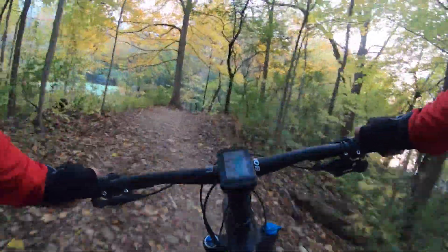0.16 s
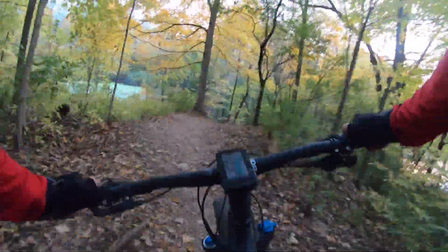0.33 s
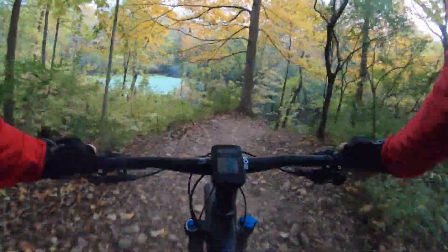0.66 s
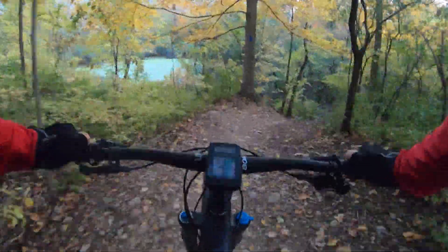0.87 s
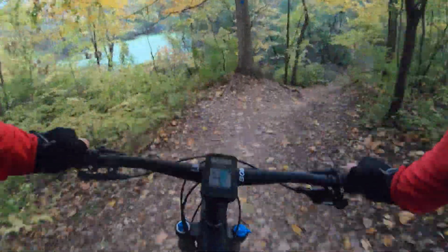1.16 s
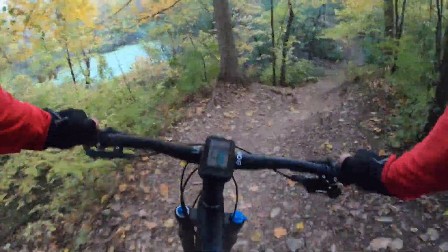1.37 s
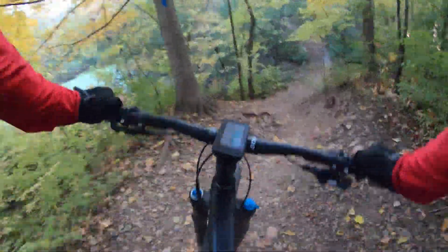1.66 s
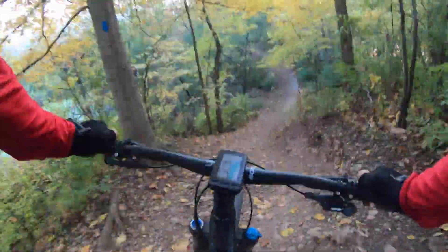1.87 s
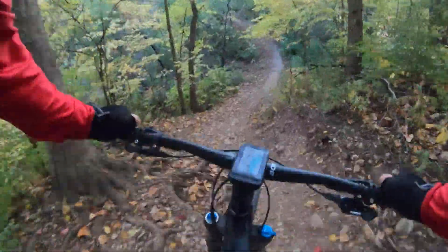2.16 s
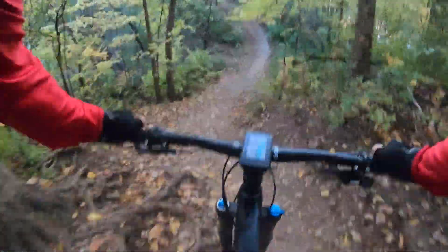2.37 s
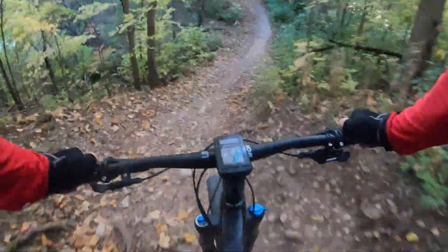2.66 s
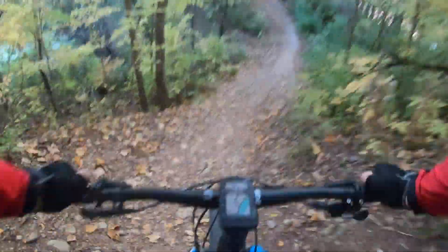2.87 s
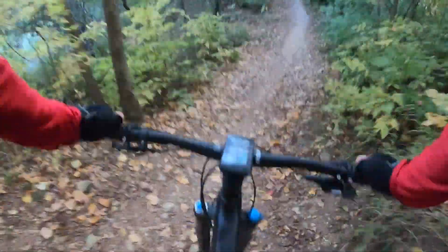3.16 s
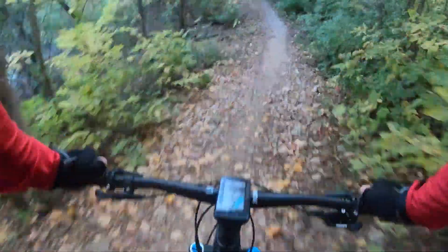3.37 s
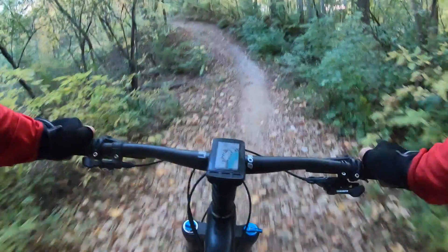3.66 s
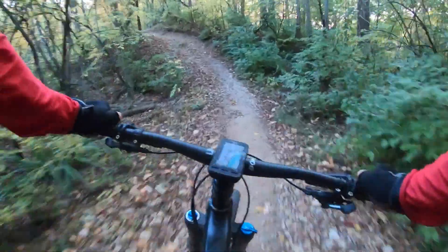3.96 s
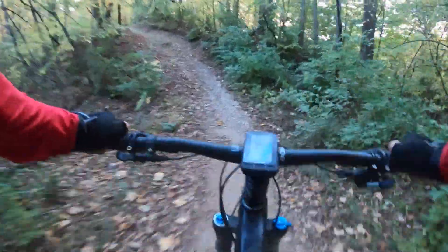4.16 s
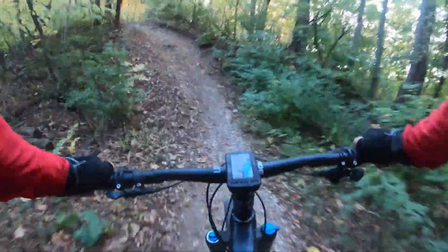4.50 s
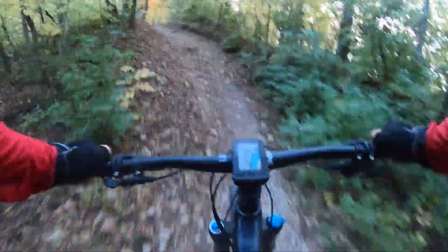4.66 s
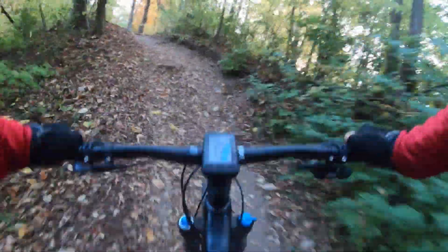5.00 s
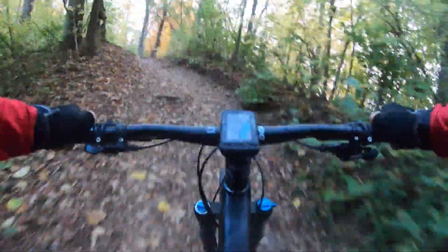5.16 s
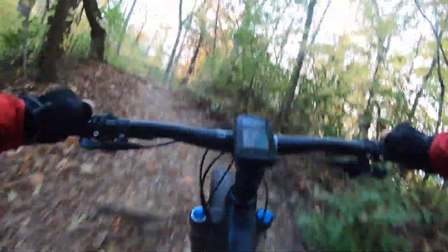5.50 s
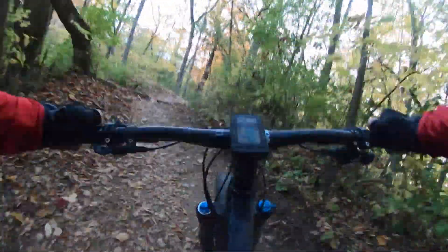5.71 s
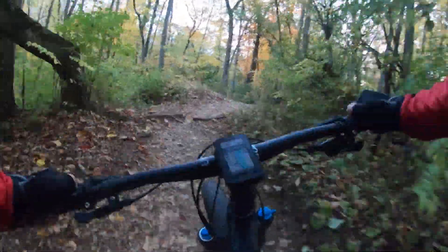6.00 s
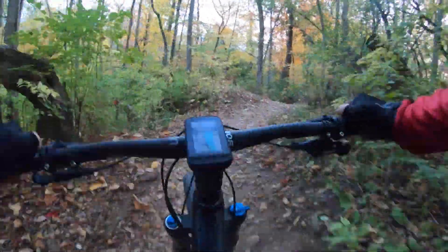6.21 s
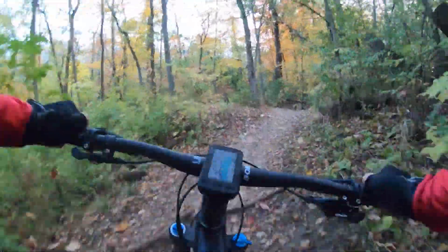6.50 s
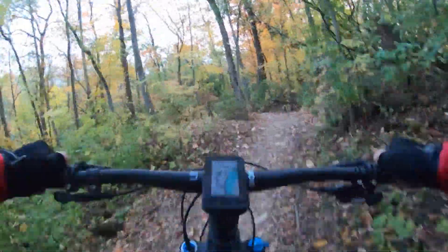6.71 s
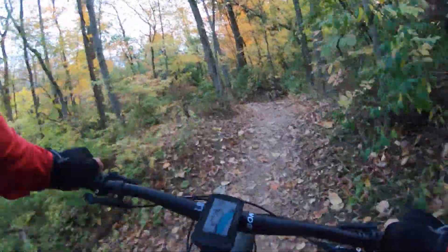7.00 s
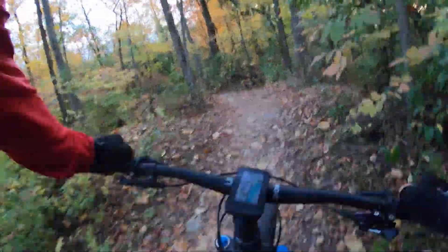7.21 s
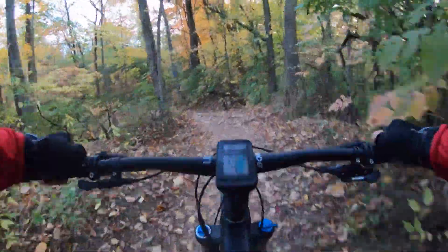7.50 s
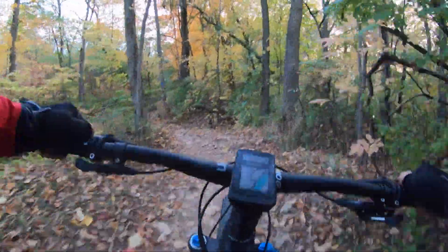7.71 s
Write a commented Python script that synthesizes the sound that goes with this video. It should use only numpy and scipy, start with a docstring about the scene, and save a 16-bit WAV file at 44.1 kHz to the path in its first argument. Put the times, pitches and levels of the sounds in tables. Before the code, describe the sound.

Throughout about eight seconds, bicycle tyres crunch grit, pebbles and dry leaves in small irregular clumps, with a faint low thrum, while wind rumbles at a chest-worn microphone, gusting mostly on the left. At 0.25 s a hollow knock and thump sound, then a small click. A strong fluttering gust fills 0.6 to 1 s; sharp pebble-like knocks come at 1.1 and a bright click at 1.26. Jolts begin around 1.5 and crowd together from 2.1 to 3.4: dull thumps, rattling chain, frame clunks and cable taps, with wind surging near 3. From 3.6 to 4.6 it is mostly gritty rolling and softer wind. A click, thump and gust hit at 4.65 to 4.9. Two thin, high chirps appear at 5.45 and 5.6. A brief hard gust buffets at 6.1; clicks and a thump follow at 6.5 to 6.8, then hard hollow clunks at 7.15 and 7.37, and a last tap at 7.5.

```python
"""A mountain bike rolls down a leafy dirt trail: its tyres crunch clumps of grit, pebbles and dry leaves.
Heard from two microphone ports at the rider's chest, an arm's length from the bar. Filtered noise buffets
each port as wind, and gusts catch the left one. Roots jolt the bike into thumps and sprays of rattling grains;
cables click, short pitched knocks and thuds sound and the frame clunks, all as decaying tones. Two thin chirps
sound."""
import sys
import numpy as np
from scipy import signal
from scipy.fft import rfft, irfft, next_fast_len
from scipy.io import wavfile
from scipy.ndimage import uniform_filter1d, map_coordinates

SR = 44100
rng = np.random.default_rng(int(sys.argv[2]) if len(sys.argv) > 2 else 0)


def unload_audio(sound):
    """Save the sound as a 16-bit wav file, at the path given as the first command line argument."""
    columns = np.transpose(np.atleast_2d(sound))
    # keep every value between -1 and 1, then stretch to whole-number steps
    steps = np.round(np.clip(columns, -1, 1) * 32767)
    wavfile.write(sys.argv[1], SR, steps.astype(np.int16))


N = 346185  # samples


def amp(db):
    """Decibels to gain."""
    return 10 ** (np.asarray(db) / 20)


def ports(left_db, right_db):
    """Gains for the left and right microphone port."""
    return amp([[left_db], [right_db]])


def unit(x):
    """Scale to rms 1."""
    return x / np.sqrt(np.mean(x ** 2) + 1e-20)


def along(points, hz):
    """Read (Hz, value) points on a log frequency axis."""
    f, v = np.transpose(points)
    return np.interp(np.log(hz + 1), np.log(f + 1), v)


def curves(rows):
    """One value per sample for each column after the time."""
    s, *cols = np.transpose(rows)
    return [np.interp(np.arange(N) / SR, s, c) for c in cols]


def wobble(rate):
    """A smooth random curve, rate knots a second."""
    knots = rng.standard_normal(int(N * rate / SR) + 4)
    return map_coordinates(knots, [np.arange(N) * rate / SR], order=2)


def filtered(x, response):
    """Multiply the spectrum of x by a response of frequency."""
    m = next_fast_len(N + SR // 2)
    return irfft(rfft(x, m) * response(np.fft.rfftfreq(m, 1 / SR)), m)[..., :N]


def colour(x, spectrum, size=8192):
    """Pass x through a causal, minimum-phase filter with the given spectrum."""
    gain = amp(along(spectrum, np.fft.rfftfreq(size, 1 / SR)))
    # folding the cepstrum onto positive times makes the filter minimum phase
    cepstrum = irfft(np.log(gain))
    cepstrum[1:size // 2] *= 2
    cepstrum[size // 2 + 1:] = 0
    impulse = irfft(np.exp(rfft(cepstrum)))
    return signal.oaconvolve(x, impulse[None], axes=1)[:, :N]


def hiss():
    """Two unrelated white noises."""
    return rng.standard_normal((2, N))


def grains(rate, spread_db):
    """Two trains of tiny impacts of random size at the same random moments, rate a second; rms 1."""
    hit = rng.random(N) < rate / SR
    size_db = spread_db * np.clip(rng.standard_normal(N), -2, 2)
    return unit(hiss() * hit * amp(size_db))


# How alike the bike sounds at the two ports. Each row: frequency in Hz, left-right likeness (1 = identical).
LIKENESS = [(300, 1), (550, 1), (1700, -0.14), (2300, 0.65), (4000, 0.98), (6000, 0.14), (9000, -0.0086)]


def from_bike(pair, spectrum):
    """Colour two excitations and mix them as the two ports hear the bike; rms 1."""
    def balance(hz):
        angle = np.arccos(np.clip(along(LIKENESS, hz), -1, 1)) / 2
        return np.array([np.cos(angle), np.sin(angle)])
    mid, side = filtered(colour(pair, spectrum), balance)
    return unit(np.array([mid + side, mid - side]))


def add(track, s, sound):
    """Mix a sound into a track at time s."""
    start = max(round(s * SR), 0)
    track[..., start:start + sound.shape[-1]] += sound[..., :N - start]


def bursts(times, levels_db, attack, t60):
    """An envelope that rises quickly at each time and dies away, 60 dB in t60 seconds."""
    envelope, t = np.zeros(N), np.arange(SR // 2) / SR
    for s, db in zip(times, levels_db):
        add(envelope, s, amp(db - 60 * t / t60) * (1 - np.exp(-t / attack)))
    return envelope


def swells(rows, rise, fall):
    """Sum rows of (s, length s, dB) into one envelope: each rises, holds and falls away."""
    envelope, t = np.zeros(N), np.arange(N) / SR
    for s, length, db in rows:
        onset = (1 + np.tanh((t - s) / rise)) / 2
        release = (1 - np.tanh((t - s - length) / fall)) / 2
        envelope += amp(db) * onset * release
    return envelope


PATCH_HZ, PATCH_S = 450, .018  # size of one patch in frequency and time


def patchy(x, depth_db, size=256):
    """Every stone and leaf rings differently: random peaks come and go across the spectrum; rms 1."""
    z = signal.stft(x, nperseg=size)[2]
    field = rng.standard_normal(z.shape[1:])
    field = uniform_filter1d(field, round(PATCH_HZ * size / SR), axis=0)
    field = unit(uniform_filter1d(field, round(PATCH_S * SR * 2 / size), axis=1))
    varied = z * amp(depth_db * np.clip(field, -2, 2))
    return unit(signal.istft(varied, nperseg=size)[1][:, :N])


# Thin chirps, perhaps beside the trail. Each row: start in seconds, level in dB before the soft attack.
CHIRPS = [(5.434, -26), (5.608, -29)]


def chirps():
    """Two thin chirps, perhaps a small bird beside the trail: a sine of wavering pitch in short bursts."""
    s, db = np.transpose(CHIRPS)
    hz = 6350 + 260 * wobble(400)
    return bursts(s, db, attack=0.018, t60=0.04) * np.sin(2 * np.pi * np.cumsum(hz) / SR)


# Air streaming past the chest. Each row: time in seconds, airflow in dB before the port offsets.
AIRFLOW = [(0, -42), (0.6, -36), (1.0, -29), (1.6, -49), (2.3, -41.5), (2.85, -23.5), (3.3, -26.5),
           (3.85, -32.5), (4.25, -24), (4.75, -32.5), (5.1, -37), (5.95, -32), (6.25, -31), (6.7, -38),
           (7.85, -35)]
LEFT_PORT_DB, RIGHT_PORT_DB = 4.5, -11  # the left port faces the stream
# Gusts catching the left port. Each row: start in seconds, length in seconds,
# airflow in dB, roar in dB before the port balance.
GUSTS = [(0.048, 0.21, -20.5, -51), (0.44, 0.17, -24, -41.5), (0.61, 0.39, -18, -27.5),
         (0.988, 0.56, -21, -38.5), (1.81, 0.031, -14.5, -29), (2.97, 0.2, -16, -30),
         (3.206, 0.15, -17, -24.5), (3.57, 0.43, -22.5, -35), (4.005, 0.67, -25.5, -41),
         (4.73, 0.19, -14.5, -24.5), (4.997, 0.92, -24, -47.5), (5.422, 0.15, -20.5, -29),
         (6.071, 0.035, -7.5, -27), (6.152, 0.39, -23.5, -37.5), (6.72, 0.17, -23, -38.5),
         (7.726, 0.06, -11.5, -32)]
GUST_RISE_S, GUST_FALL_S = 0.029, 0.044
ROAR_RISE_S, ROAR_FALL_S = 0.013, 0.037  # the roar sets in and dies more sharply than the buffet
ROAR_GROWS = 1.53  # dB of steady roar per dB of airflow
TEAR_DB, TEAR_GROWS = -33, 1.24  # in the hardest gust, before the port balance; dB per dB of roar
# Wind at the ports: slow pressure swings, buffeting, roar, and the upper edge of a hard gust.
# Each row: frequency in Hz, relative level in dB per Hz.
SWAY = [(10, -5.5), (35, 0), (90, -5), (1500, -100)]
BUFFET = [(20, -20), (65, -0.5), (120, -5), (200, -14.5), (400, -35), (3000, -100)]
ROAR = [(50, -22.5), (130, 2), (330, -1.5), (500, -13), (900, -32), (1600, -35.5), (12000, -85)]
TEAR = [(150, -1), (650, -4), (1400, -22.5), (9000, -62)]


def wind():
    """Eddies buffet each port on its own; gusts catch the left one and break into a higher, fluttering roar."""
    air_db, = curves(AIRFLOW)
    s, length, buffet_db, roar_db = np.transpose(GUSTS)
    gust = swells(zip(s, length, buffet_db), GUST_RISE_S, GUST_FALL_S)
    gust_roar = swells(zip(s, length, roar_db), ROAR_RISE_S, ROAR_FALL_S)
    left_air = np.hypot(amp(air_db + LEFT_PORT_DB), gust)
    port_air = np.array([left_air, amp(air_db + RIGHT_PORT_DB)])
    flutter = amp(2 * np.array([wobble(30), wobble(30)]))
    buffet = amp(-6.5) * port_air ** 0.82 * unit(colour(hiss(), BUFFET))
    # the largest eddies grow less with airspeed than the small ones
    sway = amp(-19.0) * port_air ** 0.35 * unit(colour(hiss(), SWAY))
    steady_roar = amp(-44.5 + ROAR_GROWS * (air_db - air_db.mean()))
    roar_level = np.hypot(steady_roar, gust_roar * ports(3, -9))
    roar = roar_level * unit(colour(hiss(), ROAR) * flutter)
    tear_level = amp(TEAR_DB) * (gust_roar / gust_roar.max()) ** TEAR_GROWS
    tear = tear_level * unit(colour(hiss(), TEAR) * flutter)
    return sway + buffet + roar + tear * ports(3, -7)


# Hard knocks through the frame, below the chest. Each row: start in seconds, then the
# low, middle and high ring in dB before the mode levels.
CLUNKS = [(0.245, -32, -40, -46), (2.506, -28.5, -33, -31), (2.81, -36, -38, -45), (7.151, -21, -30.5, -29),
          (7.367, -21.5, -33.5, -31)]
# Modes of the hollow frame. Each row: frequency in Hz, relative level in dB, 60 dB decay in seconds.
FRAME = [(465, -2.5, 0.068), (618, 0.5, 0.069), (694, -2.5, 0.059), (865, 6.5, 0.023), (1000, -5.5, 0.12),
         (1234, 4, 0.029), (1490, 2.5, 0.018), (2320, -3, 0.015)]
# Fine contacts of chain and loose parts, also used for scrapes.
# Each row: frequency in Hz, relative level in dB per Hz.
RATTLE = [(900, -1), (1800, -2), (2400, 5), (3600, -3.5), (4700, -11.5), (7600, -13.5), (11000, -28.5)]
# the chain chatters on after the blow: mean rate, level against the blow, 60 dB decay
REBOUNDS_PER_S, REBOUND_DB, REBOUND_T60_S = 1200, -10, 0.3


def clunks():
    """A hard knock rings the hollow frame; the chain rebounds against it and keeps it rattling."""
    frame, t = np.zeros((2, N)), np.arange(SR // 3) / SR
    hz, mode_db, t60 = np.transpose(FRAME)[:, :, None]
    # the two ports hear each mode out of step
    phase = np.pi * np.arange(len(hz))[:, None] + np.array([0, 1.7])[:, None, None]
    swing = np.sin(2 * np.pi * hz * t + phase)
    for s, low_db, mid_db, high_db in CLUNKS:
        level = mode_db + np.select([hz < 800, hz < 1600], [low_db, mid_db], high_db)
        ring = np.sum(amp(level - 60 * t / t60) * swing, axis=1) * (1 - np.exp(-t / 0.0012))
        rebounds = (rng.random(len(t)) < REBOUNDS_PER_S / SR) * rng.choice([-1, 1], len(t))
        contacts = rebounds * amp(REBOUND_DB - 60 * t / REBOUND_T60_S)
        contacts[0] = 1  # the blow itself
        add(frame, s, signal.fftconvolve(ring, contacts[None], axes=1))
    s, _, _, high_db = np.transpose(CLUNKS)
    links = bursts(s, high_db - 6.5, attack=0.00044, t60=0.32)
    links = links * from_bike(grains(rate=3800, spread_db=5.5), RATTLE)
    return (frame + links) * ports(1.8, -1.8)


# Short pitched knocks: stones and loose parts striking the bike, and low thuds of the tyres on the ground.
# Each row: start in seconds, lower tone in Hz, its level in dB, upper tone in Hz, its level in dB,
# 60 dB decay in seconds; levels are before attack and port balance.
KNOCKS = [(0.2445, 253, -19.5, 643, -19, 0.15), (1.1065, 1210, -16.5, 1900, -19.5, 0.02),
          (1.125, 1330, -21, 2600, -27, 0.025), (1.138, 1220, -23, 2230, -24.5, 0.02),
          (1.751, 360, -18, 650, -31.5, 0.023), (2.47, 1430, -29.5, 1880, -29, 0.03),
          (2.553, 235, -16.5, 415, -24, 0.05), (4.891, 660, -20.5, 1450, -32.5, 0.033),
          (5.043, 1750, -29, 2390, -28.5, 0.025), (6.717, 757, -28.5, 1460, -31.5, 0.031),
          (7.1523, 850, -18, 2220, -20.5, 0.023), (7.278, 680, -24, 1080, -28, 0.023)]
KNOCK_ATTACK_S, KNOCK_ROUGH_RAD, KNOCK_SKEW_RAD = 0.00053, 0.51, 0.8  # rise, unsteadiness, port phase
KNOCK_SCRAPE_DB, KNOCK_SCRAPE_T60_S = -10, 0.05  # the gritty contact, against the upper tone


def knocks():
    """Stones and loose parts strike the bike and tyres thud on the ground: a scrape and two unsteady tones."""
    tones, t = np.zeros((2, N)), np.arange(SR // 3) / SR
    waver = KNOCK_ROUGH_RAD * wobble(400)
    for s, low_hz, low_db, high_hz, high_db, t60 in KNOCKS:
        phase = np.array([[0], [KNOCK_SKEW_RAD]]) + waver[round(s * SR):][:len(t)]
        low = amp(low_db) * np.sin(2 * np.pi * low_hz * t + phase)
        high = amp(high_db) * np.sin(2 * np.pi * high_hz * t + phase)
        add(tones, s, (low - high) * amp(-60 * t / t60) * (1 - np.exp(-t / KNOCK_ATTACK_S)))
    s, _, _, _, high_db, _ = np.transpose(KNOCKS)
    scrape = bursts(s, high_db + KNOCK_SCRAPE_DB, KNOCK_ATTACK_S, KNOCK_SCRAPE_T60_S)
    scrape = scrape * from_bike(hiss(), RATTLE)
    return (tones + scrape) * ports(1.5, -1.5)


# Cables and levers tapping the bar in front of the chest. Each row: start in seconds,
# peak of the ring in dB before the port balance, hollow tone (modes below 1600 Hz) in relative dB.
CLICKS = [(0.321, -23, 1), (0.746, -30.5, -10), (1.2634, -13, 4), (1.576, -23.5, -6), (1.6196, -27.5, -8),
          (2.4237, -19, -8), (2.5473, -19.5, -15.5), (2.744, -19, -10), (2.854, -18, -18), (2.933, -22, 8),
          (2.995, -27, -10), (3.094, -30.5, -26.5), (3.2468, -26, -12), (4.1906, -25.5, -3),
          (4.6524, -20.5, 2), (6.4808, -22.5, -15.5), (6.546, -20, -7), (6.756, -23, -6), (6.994, -41, -34),
          (7.2945, -18.5, -5), (7.5038, -21, -6.5)]
# Modes of the bar. Each row: frequency in Hz, relative level in dB, 60 dB decay in seconds.
BAR = [(830, -6.5, 0.019), (1470, 9, 0.0064), (2250, 1.5, 0.019), (2704, 9.5, 0.0085), (3490, 2, 0.0072)]


def clicks():
    """A cable or lever taps the bar: a dry ring of a few milliseconds and a tiny scrape."""
    taps, t = np.zeros(N), np.arange(SR // 20) / SR
    hz, mode_db, t60 = np.transpose(BAR)[:, :, None]
    # neighbouring modes swing in opposite directions, so the tap starts softly
    direction = (-1) ** np.arange(len(BAR))[:, None]
    for s, db, hollow_db in CLICKS:
        pitch = hz * rng.normal(1, .025, hz.shape)
        level = mode_db + hollow_db * (hz < 1600)
        swing = direction * np.sin(2 * np.pi * pitch * t)
        ring = np.sum(amp(level - 60 * t / t60) * swing, axis=0) * (1 - np.exp(-t / 0.00047))
        add(taps, s, amp(db) * ring / np.abs(ring).max())
    s, db, hollow_db = np.transpose(CLICKS)
    scrape = bursts(s, db - 16.0 - 0.9 * hollow_db, attack=0.0005, t60=0.031)
    scrape = scrape * from_bike(hiss(), RATTLE)
    return (taps + scrape) * ports(.7, -.7)


# Roots and ruts under the wheels. Each row: start in seconds, then rattle (before the port balance)
# and thump in dB before their attacks.
JOLTS = [(0.246, -53, -21.5), (1.474, -34, -29.5), (1.685, -47, -24.5), (1.851, -38, -27.5),
         (2.132, -35, -22), (2.198, -51, -28), (2.306, -43, -23.5), (2.416, -40, -18.5),
         (2.541, -37, -19.5), (2.63, -35, -24), (2.719, -40, -20), (2.815, -29.5, -15.5), (2.854, -28, -24),
         (2.914, -26, -21.5), (3.076, -32, -24.5), (3.216, -37.5, -20.5), (3.415, -31, -22),
         (4.728, -36.5, -20), (4.862, -51, -24.5), (6.714, -38.5, -23.5), (7.091, -46.5, -25.5)]
CLATTER_DB = 3  # clatter above the mean of rattle and thump
# Loose parts clattering. Each row: frequency in Hz, relative level in dB per Hz.
CLATTER = [(250, 1), (480, -2.5), (650, 1.5), (900, -3), (1300, -5), (1900, -14.5), (9000, -58)]
# Tyre and frame rumble, shared with tyres(). Each row: frequency in Hz, relative level in dB per Hz.
THRUM = [(60, -18), (190, -7.5), (245, -6), (280, 4), (330, -8), (520, -17), (650, -13.5), (760, -41),
         (8000, -100)]


def jolts():
    """Each root thumps the tyres and shakes the chain and loose parts into a short spray of fine contacts."""
    s, rattle_db, thump_db = np.transpose(JOLTS)
    thump = bursts(s, thump_db, attack=0.0028, t60=0.13) * from_bike(hiss(), THRUM)
    clatter_db = (rattle_db + thump_db) / 2 + CLATTER_DB
    parts = patchy(from_bike(grains(rate=2400, spread_db=0.0), CLATTER), depth_db=-1.5)
    clatter = bursts(s, clatter_db, attack=0.002, t60=0.056) * parts
    contacts = patchy(from_bike(grains(rate=2000, spread_db=0.5), RATTLE), depth_db=4.0)
    rattle = bursts(s, rattle_db, attack=0.00075, t60=0.15) * contacts
    return thump + (clatter + rattle) * ports(1, -1)


def stones(rate, pitch_hz, cycles, spread_db):
    """Pebbles and twigs flicked by the tread: each gives a dry tick at a pitch of its own; rms 1."""
    count, t = int(rate * N / SR), np.arange(SR // 50) / SR
    when, size, pitch, lag = rng.random((count, 4)).T[:, :, None]
    hz = pitch_hz * 2 ** (3 * pitch - 1.5)  # three octaves around pitch_hz
    size_db = -spread_db * np.log(size * .98 + .02)
    # each tick falls 60 dB in the given number of cycles
    ring = amp(size_db - 60 * t * hz / cycles) * np.sqrt(pitch_hz / hz) * (1 - np.exp(-t * hz))
    index = ((when * N).astype(int) + np.arange(len(t))).ravel()
    # low rings reach the two ports out of step, high ones together
    skew = np.pi * (2 * lag - 1) * (hz < 2000)
    heard = []
    for phase in (0, skew):
        ticks = ring * np.sin(2 * np.pi * hz * t + phase)
        heard.append(np.bincount(index, ticks.ravel())[:N])
    return unit(np.array(heard))


# The ground under the tyres. Each row: time in seconds, grit and dry leaves in dB before the offsets below.
TRAIL = [(0.0, -39.5, -59.5), (0.92, -44.5, -61), (1.9, -46, -59.5), (2.97, -41.5, -52.5),
         (3.3, -46, -59.5), (3.78, -39, -60), (4.4, -47, -61), (4.7, -40.5, -57), (5.03, -40.5, -69.5),
         (5.66, -44, -60.5), (6.0, -50, -65), (6.56, -45, -61), (7.0, -51, -60.5), (7.28, -42, -60),
         (7.85, -45.5, -62)]
# Loose patches where the tyres scuff. Each row: start in seconds, length in seconds,
# grit and leaves in dB before the layer gains below.
SCUFFS = [(0.13, 0.13, -48, -54.5), (2.435, 0.42, -45, -70), (2.814, 0.12, -44, -47.5),
          (3.069, 0.065, -35.5, -49), (3.62, 0.86, -44.5, -63), (4.665, 0.2, -47, -54),
          (4.979, 0.095, -36, -62)]
SCUFF_RISE_S, SCUFF_FALL_S = 0.0063, 0.0097
WHEEL_HZ, WHEEL_START_S = 3.03, .17  # turns per second, time of one swell
TURN_GRIT_DB, TURN_LEAVES_DB = 0.7, 1.5  # swell either way, once per turn of the wheel
# Grit and dry leaves under the tread. Each row: frequency in Hz, relative level in dB per Hz.
GRIT = [(300, 14.5), (600, 4.5), (1000, 11), (1400, 6.5), (1750, 1), (2400, 6), (3300, -2), (4500, -19),
        (15000, -67)]
LEAVES = [(2000, 4.5), (4000, -1.5), (7600, -3.5), (8300, -8.5), (15000, -16.5)]


def tyres():
    """Knobs crush grit and leaves in small clumps, swelling with each wheel turn; tyres and frame thrum."""
    ground_db, litter_db = curves(TRAIL)
    turn = np.cos(2 * np.pi * WHEEL_HZ * (np.arange(N) / SR - WHEEL_START_S))
    s, length, grit_db, leaves_db = np.transpose(SCUFFS)
    scuff_grit = swells(zip(s, length, grit_db), SCUFF_RISE_S, SCUFF_FALL_S)
    scuff_leaves = swells(zip(s, length, leaves_db), SCUFF_RISE_S, SCUFF_FALL_S)
    crunch = np.hypot(amp(ground_db + 1.5 + TURN_GRIT_DB * turn), scuff_grit)
    rustle = np.hypot(amp(litter_db + 8.0 + TURN_LEAVES_DB * turn), scuff_leaves * amp(2.5))
    clumps = np.maximum(wobble(80), -1)  # some grit is always under the tread
    crushed = patchy(from_bike(grains(rate=2400, spread_db=2.0), GRIT), depth_db=4.5)
    grit = crunch * amp(-1.5 + 2.1 * clumps) * crushed
    ticks = stones(rate=380, pitch_hz=1400, cycles=15, spread_db=2.6)
    pebbles = crunch * amp(-5.5 + 1.8 * clumps + 1.6 * wobble(12)) * ticks
    crackle = from_bike(grains(rate=9000, spread_db=0.7), LEAVES)
    leaves = rustle * amp(1.96 * clumps + 1.8 * wobble(60)) * crackle
    thrum_db = -38.0 + 0.88 * (ground_db - ground_db.mean()) + 2.73 * wobble(28)
    thrum = amp(thrum_db) * from_bike(hiss(), THRUM)
    return (grit + pebbles) * ports(.8, -.8) + leaves * ports(1.8, -1.8) + thrum


def scene():
    """The bike, the air that rushes past it and the chirps."""
    return chirps() + wind() + clunks() + knocks() + clicks() + jolts() + tyres()


# Treble lost behind the sealed port membranes. Each row: frequency in Hz, gain in dB.
MICROPHONE = [(9800, 1), (11400, -12), (15000, -14.5)]
TOP_HZ = 15700  # band limit


def record(dry):
    """The sealed microphone ports dull the top, and nothing passes above the band limit."""
    return filtered(colour(dry, MICROPHONE), lambda hz: hz < TOP_HZ)


dry = scene()
out = record(dry)
unload_audio(out)
```